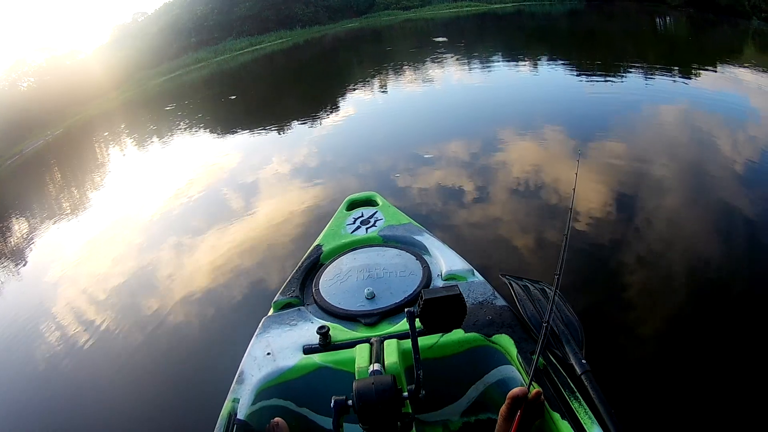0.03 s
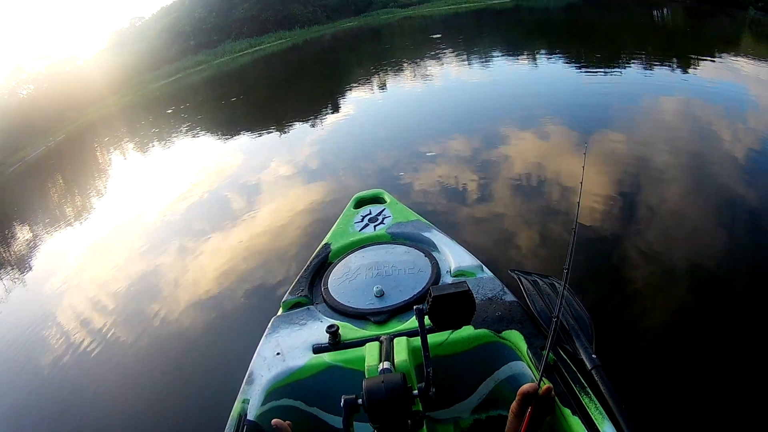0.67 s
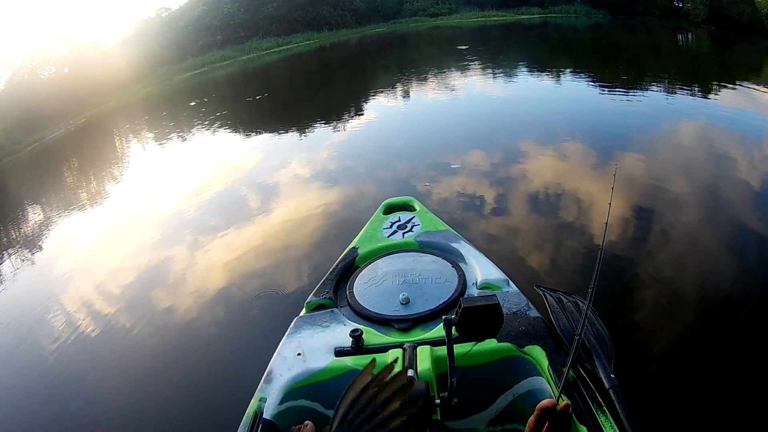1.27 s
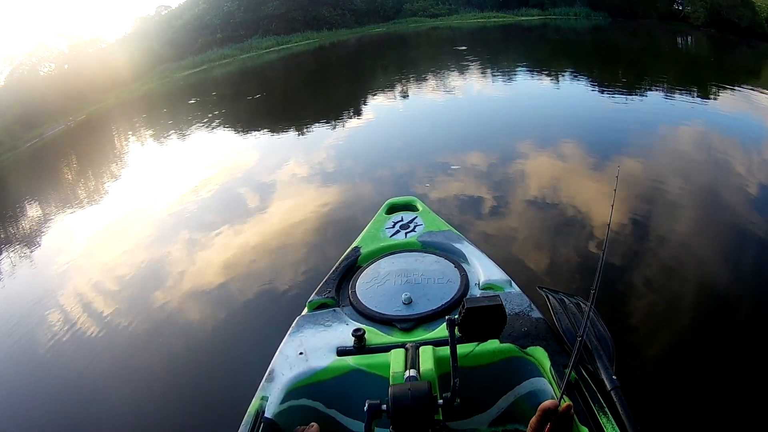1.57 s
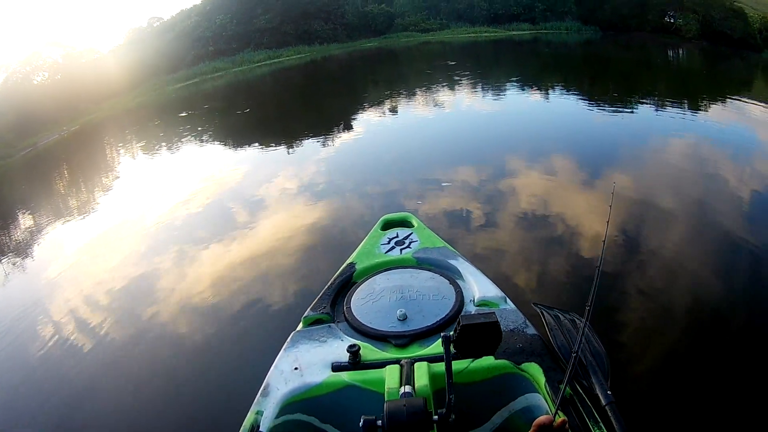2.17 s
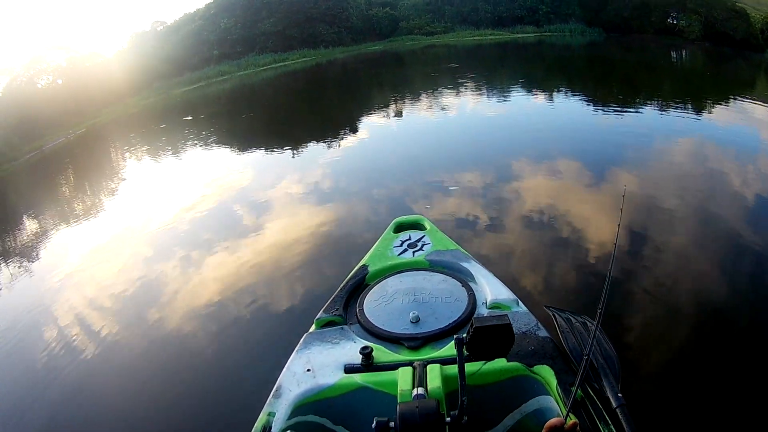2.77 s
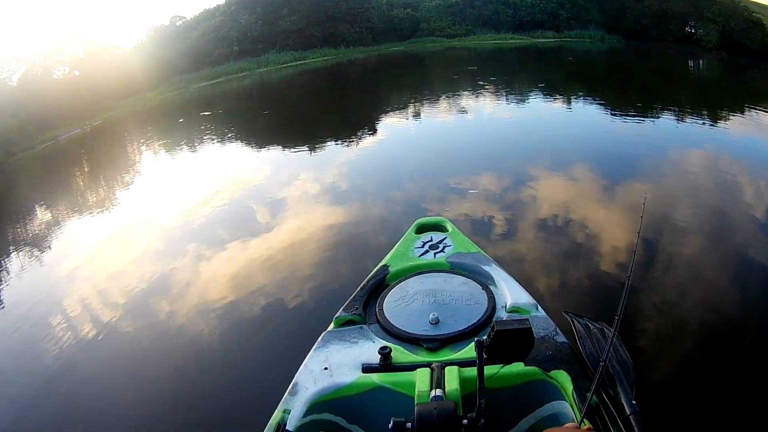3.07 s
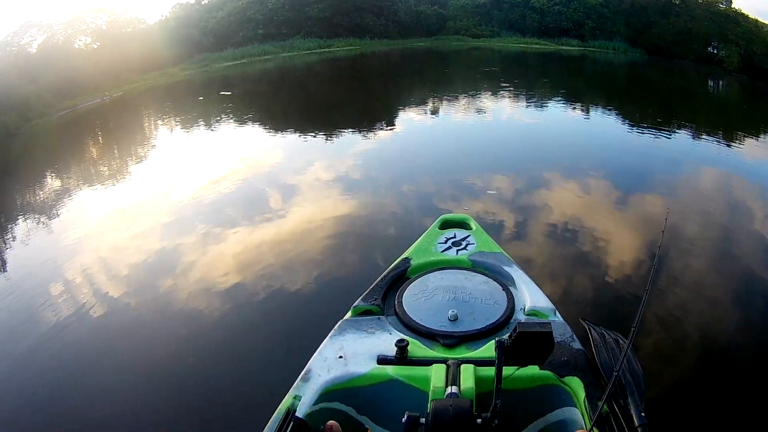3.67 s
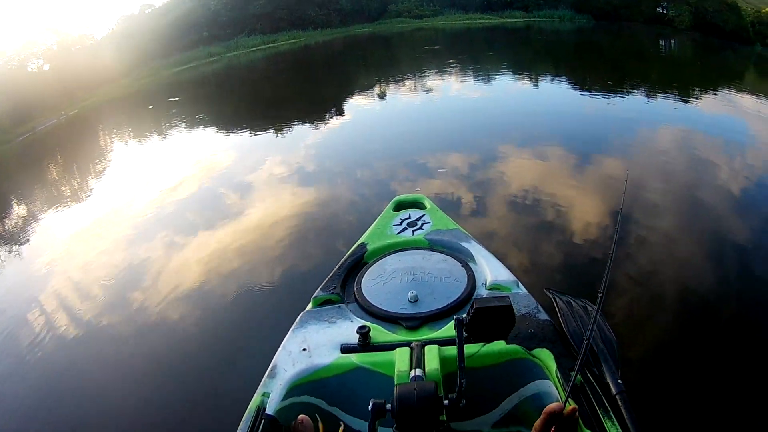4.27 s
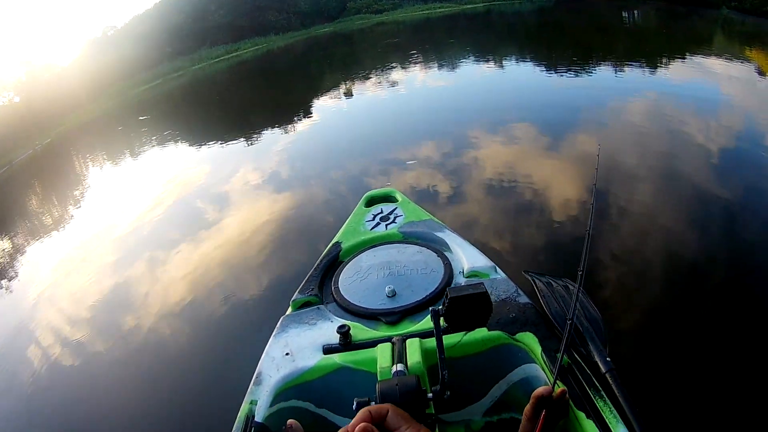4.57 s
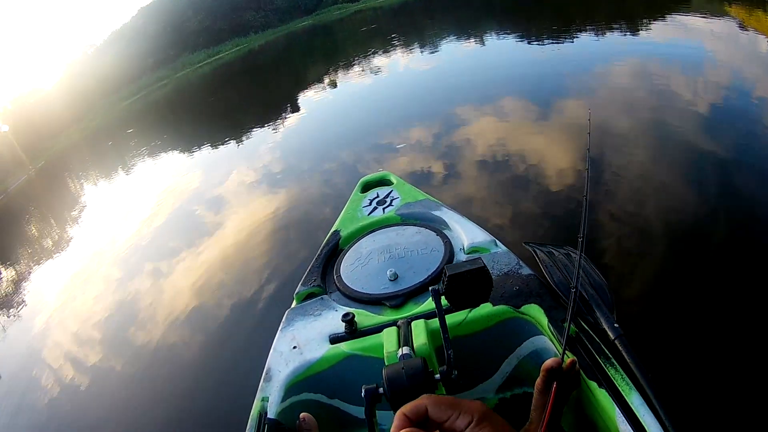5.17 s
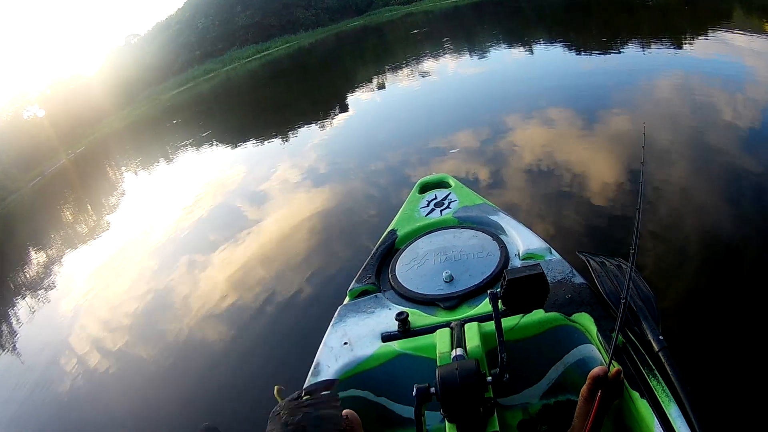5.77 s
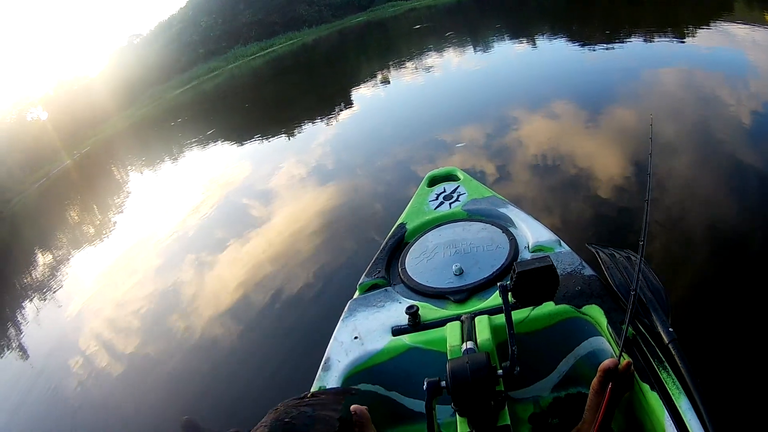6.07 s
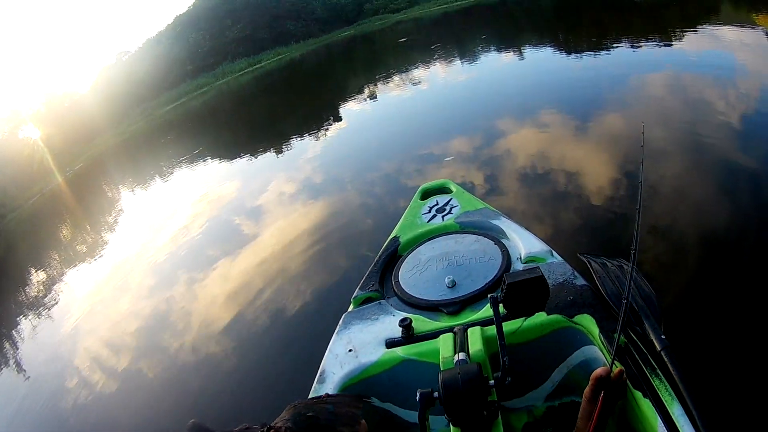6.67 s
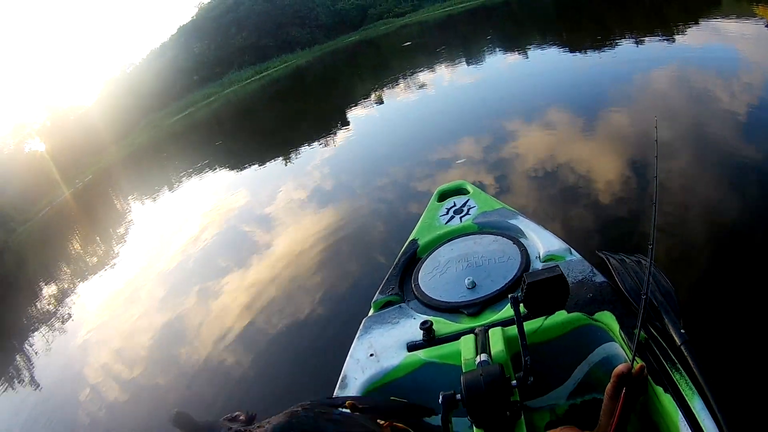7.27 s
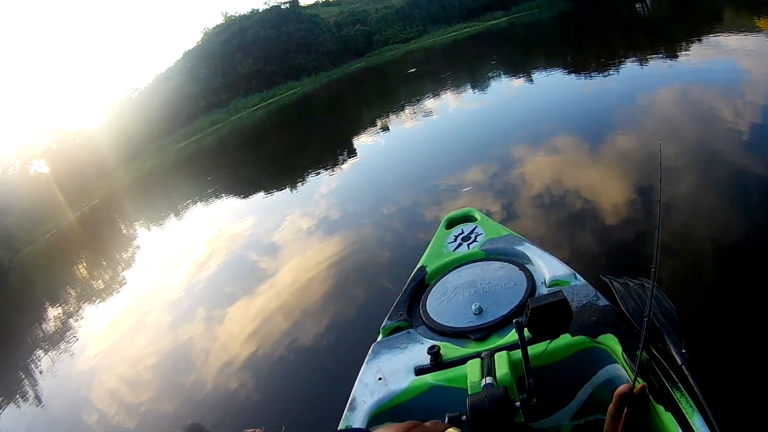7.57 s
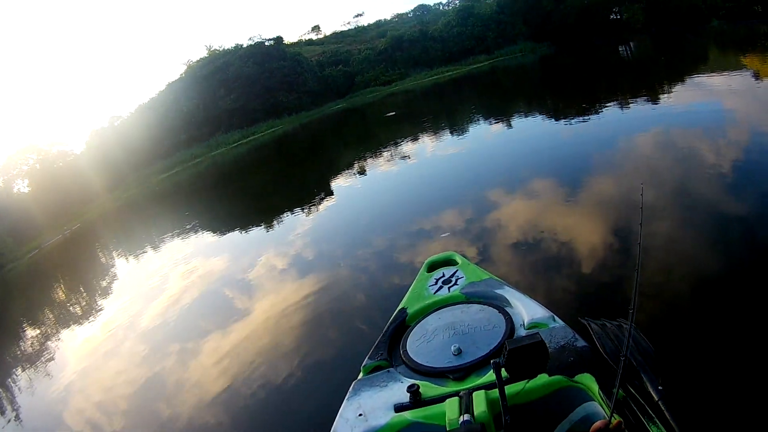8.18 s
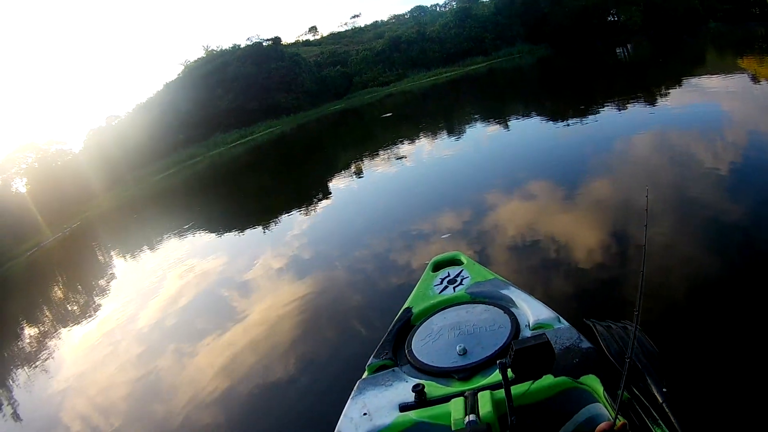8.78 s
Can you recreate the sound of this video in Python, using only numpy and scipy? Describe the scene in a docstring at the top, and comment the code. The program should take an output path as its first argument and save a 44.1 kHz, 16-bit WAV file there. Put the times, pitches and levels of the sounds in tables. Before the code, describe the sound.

On a calm lake, a distant engine hums faintly under soft air noise, tiny bird whistles and insect buzz. Up close, tackle is handled in a plastic kayak: first a run of hollow, rattly knocks and small clicks, then a brief rasping squeak. After a lull, the gear clatters and scrapes again, hits the hull with a single loud, distorting bang, and settles with some softer knocks.

```python
"""Fishing gear knocks, clicks and scrapes in a plastic kayak; one hard blow overloads the microphone.
Each knock rings the hull's modes and its hollow while the gear itself clacks; dragged gear
slips and squeaks. Behind it, on a still lake: open air, a far engine humming across the water,
one faint low tone, and birds whistling and insects buzzing on the bank."""
import sys
import numpy as np
from scipy import signal
from scipy.fft import rfft, irfft, next_fast_len
from scipy.io import wavfile

SR = 44100
rng = np.random.default_rng(int(sys.argv[2]) if len(sys.argv) > 2 else 0)


def to_wav(s):
    """Save 16-bit WAV."""
    ch = np.atleast_2d(s).T  # columns
    pcm = np.round(np.clip(ch, -1, 1) * 32767)  # PCM
    wavfile.write(sys.argv[1], SR, pcm.astype(np.int16))


N = 393813
T = np.arange(N) / SR


def undb(db):
    """Decibels to gain."""
    return 10 ** (np.asarray(db) / 20)


def unit_rms(x):
    """Scale to rms 1."""
    return x / np.sqrt(np.mean(x ** 2))


def unit_energy(x):
    """Scale to energy 1."""
    return x / np.sqrt(np.sum(x ** 2))


def add(out, start_s, x):
    """Mix x into out at start_s."""
    i = int(start_s * SR)
    out[i:i + len(x)] += x[:max(N - i, 0)]


def colour(x, points):
    """Minimum-phase filter through (freq_hz, gain_db) points."""
    hz, db = np.transpose(points)
    n = next_fast_len(len(x), True)
    bins_hz = np.maximum(np.fft.rfftfreq(n, 1 / SR), 1)
    gain = undb(np.interp(np.log(bins_hz), np.log(hz), db))
    cepstrum = irfft(np.log(gain), n)
    cepstrum[1:n // 2] *= 2
    cepstrum[n // 2 + 1:] = 0
    return irfft(rfft(x, n) * np.exp(rfft(cepstrum)), n)[:len(x)]


def cut(x, hz, kind, order=2):
    """Butterworth low-pass or high-pass."""
    return signal.sosfilt(signal.butter(order, min(hz, SR / 2 - 1), kind, fs=SR, output="sos"), x)


def resonate(x, hz, width_hz):
    """Band-pass resonance, applied twice for steep skirts."""
    b, a = signal.iirpeak(hz, hz / width_hz, fs=SR)
    return signal.lfilter(b, a, signal.lfilter(b, a, x))


def spring(x, hz, q):
    """Mass on a spring: a low-pass that rings at hz."""
    w = 2 * np.tan(np.pi * hz / SR)
    return signal.lfilter(*signal.bilinear([w * w], [1, w / q, w * w]), x)


def walk(rate_hz):
    """Random curve, spread near 1; holds after 512 knots."""
    knots = rng.standard_normal(512)
    return np.interp(T * rate_hz, np.arange(len(knots)), knots)


def fade(t, t60_s):
    """Exponential decay, 60 dB down at t60_s."""
    return np.exp(-np.log(1000) * t / t60_s)


def tone(hz):
    """Sine following a pitch curve."""
    return np.sin(2 * np.pi * np.cumsum(hz) / SR)


def swell(x):
    """Fade in and out under a rounded arch; rms 1."""
    u = np.linspace(0, 1, len(x))
    return unit_rms(x * (u * (1 - u)) ** (3 / 4))


def lake_air(level_db=-43.5, swell_db=0.5, swell_below_hz=1500):
    """Open air: the low part swells under an even hiss."""
    # air noise spectrum: freq_hz, gain_db
    spectrum = [(20, -7), (32, 6.5), (41, -7.5), (55, -3.5), (100, -5.5), (250, -7), (400, -10), (580, -8),
                (1100, -14), (1600, -22), (2400, -32), (4000, -38.5), (8000, -45), (15500, -47.5)]
    air = undb(level_db) * unit_rms(colour(rng.standard_normal(N), spectrum))
    return air + (undb(swell_db * walk(2.88)) - 1) * cut(air, swell_below_hz, "low", order=1)


def insects(flicker_db=2.4, pulse_db=0.7):
    """Insect choruses: narrow, flickering noise bands."""
    # centre_hz, width_hz, level_db
    choruses = [(4840, 240, -80.5), (5804, 509.7, -72.5)]
    out = np.zeros(N)
    for hz, width_hz, db in choruses:
        band = unit_rms(resonate(rng.standard_normal(N), hz, width_hz))
        out += band * undb(db + flicker_db * walk(30) + pulse_db * walk(12))
    return out


def engine(firing_hz=29.58, gain_db=-1.07, drift=0.0009, fading_db=1.5):
    """Firing harmonics and whines share one drifting speed and fade separately over the water."""
    # firing harmonics, fundamental first: level_db
    harmonics_db = [-54.5, -57, -53.5, -58.5, -51]
    # whines with sidebands a firing rate apart: pitch_hz, level_db, fall_per_sideband_db, odd_sideband_db
    whines = [(551.7, -52.5, 3, 0), (801.25, -60, 3, 1), (1066, -56.5, 1, -6)]
    clock_s = np.cumsum(1 + drift * walk(1.994)) / SR
    lines = [((k + 1) * firing_hz, db) for k, db in enumerate(harmonics_db)]
    lines += [(hz + k * firing_hz, db - fall_db * abs(k) + odd_db * (k % 2))
              for hz, db, fall_db, odd_db in whines for k in range(-3, 3)]
    hum = np.zeros(N)
    for k, (hz, db) in enumerate(lines):
        phase = np.pi * k ** 2 / np.sqrt(len(lines))  # distance smears the firings into an even hum
        hum += undb(db + fading_db * walk(3.047)) * np.sin(2 * np.pi * hz * clock_s + phase)
    return undb(gain_db) * np.sqrt(2) * hum


def far_tone(start_s=4.5, length_s=1.2, pitch_hz=455.5, level_db=-53.5, waver=0.0075):
    """One faint, nearly steady tone from far away."""
    out = np.zeros(N)
    curve_hz = pitch_hz * (1 + waver * walk(11.9))[:int(length_s * SR)]
    add(out, start_s, undb(level_db) * swell(tone(curve_hz)))
    return out


def far_song(start_s=2.25, end_s=5, gap_s=0.15, length_s=0.12, pitch_hz=2720, level_db=-76.5):
    """Faint scattered whistles, as rows of start_s, length_s, pitch_hz, level_db, slide."""
    return [(start_s + gap_s * (k + late / 2), length_s, pitch_hz * (1 + 0.05 * detune),
             level_db, 0.086 * lean)
            for k, (late, detune, lean) in enumerate(rng.standard_normal((20, 3)))
            if start_s + gap_s * k < end_s]


def birds(waver=0.0044, flutter_db=4.5, echo_db=-9, echo_t60_s=0.58):
    """Fluttering calls, whistles and chirps with a faint echo from the trees."""
    # two-note calls: start_s, pitch_hz, level_db
    calls = [(1.432, 3400, -63.5), (8.505, 3260, -60)]
    # short and long arch of a call: delay_s, length_s, pitch_ratio, gain_db, slide, droop
    call_notes = [(0, 0.081, 0.97, -1.5, -0.132, .22), (0.147, 0.328, 0.96, -4, .04, .21)]
    # near-level whistles: start_s, length_s, pitch_hz, level_db
    whistles = [(.174, 0.11, 2638, -65.5), (1.177, 0.086, 2935, -63), (2.954, .07, 3300, -71),
                (8.158, .17, 2517, -64.5), (8.76, 0.12, 2640, -65.5)]
    # scratchy falling chirps: start_s, mid_hz, level_db
    chirps = [(3.53, 3100, -65), (3.658, 2850, -67), (3.723, 3050, -68), (3.804, 3050, -66),
              (4.277, 3000, -67), (4.35, 2800, -70), (5.146, 5400, -67), (5.428, 5400, -66),
              (5.608, 4900, -72), (6.087, 5200, -64.5)]
    out = np.zeros(N)
    wobble, scratch = 1 + waver * walk(50.5), walk(700)

    def note(start_s, length_s, hz, db, slide, droop=0, rough=0):
        """Pitch slides, and droops at both ends, by fractions of hz."""
        n = int(length_s * SR)
        u = np.linspace(-1, 1, n)
        contour_hz = hz * (1 + slide * u / 2 - droop * u ** 2)
        add(out, start_s, undb(db) * swell(tone(contour_hz * (wobble[:n] + rough * scratch[:n]))))

    for start_s, hz, db in calls:
        for delay_s, length_s, ratio, gain_db, slide, droop in call_notes:
            note(start_s + delay_s, length_s, hz * ratio, db + gain_db, slide, droop)
    for row in whistles:
        note(*row, slide=0.022)
    for start_s, hz, db in chirps:
        note(start_s, length_s=0.036, hz=hz, db=db, slide=-0.305, rough=0.028)
    for row in far_song():
        note(*row)
    song = out * unit_rms(undb(flutter_db * walk(45)))
    trees = unit_energy(rng.standard_normal(SR) * fade(T[:SR], echo_t60_s))
    return song + undb(echo_db) * signal.fftconvolve(song, trees)[:N]


def scrapes(squeak_jitter=0.051, squeak_rough_db=4, rasp_top_hz=2700):
    """Dense uneven slips ring the dragged gear; where it sticks, it squeaks roughly."""
    # drags over the deck: start_s, length_s, level_db, squeak_from_hz, squeak_to_hz, squeak_db
    drags = [(2.804, .02, -45, 3400, 3700, -11), (2.813, 0.079, -41.5, 3250, 3110, -13.5),
             (2.868, 0.059, -52, 3280, 3220, -11), (5.729, 0.031, -42, 3473, 3400, -34),
             (5.846, 0.083, -43.5, 2940, 2800, -19)]
    # drag resonances: centre_hz, width_hz, gain_db
    resonances = [(1270, 740, 4), (1730, 260, -11), (3122, 1200, -13)]
    out = np.zeros(N)
    jitter = 1 + squeak_jitter * walk(690)
    grip = undb(squeak_rough_db * walk(310))
    for start_s, length_s, db, from_hz, to_hz, squeak_db in drags:
        n = int(length_s * SR)
        slips = rng.standard_normal(SR // 4)[:n] ** 3
        rasp = sum(undb(gain_db) * resonate(slips, hz, width_hz) for hz, width_hz, gain_db in resonances)
        rasp = cut(unit_rms(rasp), rasp_top_hz, "low", order=4)
        squeak = unit_rms(tone(np.linspace(from_hz, to_hz, n) * jitter[:n]) * grip[:n])
        add(out, start_s, undb(db) * swell(rasp + undb(squeak_db) * squeak))
    return out


def gear_clack(t, t60_s):
    """Hard gear struck: a bright noise burst."""
    # clack spectrum: freq_hz, gain_db
    spectrum = [(700, -33), (1800, 10.5), (2500, -9), (3200, -1.5), (3700, 1), (4300, -2.5), (4700, -18),
                (6000, -18.5), (8000, -38), (15000, -46)]
    return colour(rng.standard_normal(len(t)) * fade(t, t60_s), spectrum)


def ticks(t60_s=0.032, lowest_hz=2100):
    """Light tackle clicks in the hand, clear of the hull."""
    # start_s, level_db
    clicks = [(.032, -28.5), (.393, -29), (0.522, -27.5), (0.8735, -23.5), (3.98, -25), (4.894, -33)]
    out = np.zeros(N)
    for start_s, db in clicks:
        click = cut(gear_clack(T[:SR // 4], t60_s), lowest_hz, "high")
        add(out, start_s, undb(db) * unit_energy(click))
    return out


def hull_ring(t, tuning, damping, hollow_db=-14, hollow_t60_s=0.25):
    """Impulse response of one spot plus the hollow; adjacent modes oppose, so the ring builds briefly."""
    # hull modes before tuning and damping: freq_hz, level_db, t60_s
    modes = [(190.7, -32.5, 0.44), (236, -12.5, 0.12), (271, -17, 0.15), (372, -10.5, 0.047),
             (497, -10.5, 0.12), (601, 3, 0.036), (714, -1.5, 0.032), (809, -3, 0.032),
             (1022, -10.5, 0.034), (1216, -5.5, 0.054), (1448, -11.5, 0.047), (1648, -6.5, 0.017),
             (2006, -16.5, 0.073), (2176, -9.5, 0.073), (2346, -2.5, 0.011)]
    # diffuse ring inside the hull: freq_hz, gain_db
    hollow_spectrum = [(80, -15), (200, -1), (400, -2), (600, 1.5), (1200, -5.5), (1800, -5.5), (2400, -8),
                       (3000, -28), (6000, -26)]
    shell = sum((-1) ** k * undb(db) * np.sin(2 * np.pi * hz * tuning * t) * fade(t * damping, t60_s)
                for k, (hz, db, t60_s) in enumerate(modes))
    hollow = colour(rng.standard_normal(len(t)) * fade(t, hollow_t60_s), hollow_spectrum)
    return unit_energy(shell) + undb(hollow_db) * unit_energy(hollow)


def contact_force(t, chatter_s, looseness, above_firm_db, chatter_db=-4, firm_hz=4800, octave_db=5.8):
    """One impact, then small re-contacts; a lighter touch is a longer, softer push."""
    recontacts = unit_energy(rng.standard_normal(len(t)) ** 3 * np.exp(-t / chatter_s))
    force = undb(chatter_db) * looseness * recontacts
    force[0] += 1
    return cut(force, firm_hz * 2 ** (above_firm_db / octave_db), "low")


def knocks(gain_db=22, firm_db=-20, rim_below_db=-6, loose_chatter_s=0.0052, clack_t60_s=0.038,
           tip_delay_s=0.006, tip_db=-1.3, tip_pitch_ratio=1.25, tip_tuning=0.81, lowest_hz=150):
    """Gear chatters on the hull, rings it and clacks; a firm blow tips it onto its other end too."""
    # gear striking the hull: start_s, level_db, pitch_hz, boom_db, clack_db, chatter_s
    blows = [ (0.093, -17, 930, 8, -16.5, 0.0078), (0.1767, -25.5, 1170, 6, -19.5, 0.0077),
             (0.4428, -26.5, 1020, 10, -21, 0.0044), (0.9388, -15, 1200, 7.5, -11.5, 0.0085),
             (0.969, -24.5, 1000, 2, -13, .0009), (1.362, -32, 1020, 7, -25, 0.015),
             (1.470, -29.5, 840, 9, -22, 0.0018), (1.5276, -25.5, 1650, -3, -29, 0.0056),
             (1.5536, -26, 855, 14, -24, 0.0014), (1.9685, -37, 790, -4, -34, .0013),
             (4.469, -34, 220, -5, -30, 0.0051), (5.563, -30, 226, -2, -27.5, 0.0069),
             (5.7288, -34.5, 1600, -5, -8, .021), (5.854, -29.5, 1100, -12, -27, 0.0071),
             (5.8701, -17.5, 1050, -7, -34, .0025), (5.900, -25.5, 1230, -4, -36, .0008),
             (5.916, -30, 1260, -6, -30, 0.007), (5.964, -31, 935, -3, -25, 0.0018),
             (6.0676, -31.5, 900, -2, -38, .001), (6.546, -20.5, 749.7, -5, -15.5, 0.000955),
             (6.5622, -0.46, 1180, 0.5, -29, 0.0002), (6.612, -16, 1240, 0, -28, .0022),
             (6.954, -34.5, 1280, -8.5, -20, .003), (7.004, -25, 980, -11, -32.5, .005),
             (7.0424, -34.5, 870, -4, -19, .001)]
    t, out = T[:SR // 4], np.zeros(N)
    for start_s, db, pitch_hz, boom_db, clack_db, chatter_s in blows:
        looseness = chatter_s / loose_chatter_s
        rim_db = max(rim_below_db - boom_db, 0)  # little boom: the stiff rim
        gear_q = 2.24 + 0.8 * rim_db  # gear rings longer on the rim
        damping = 1.5 - 0.014 * db  # after a light touch the gear stays on the hull and damps it
        # the magnitude sets the pitch: the lightest touches go far negative and ring high
        tuning = 1.02 - 0.36 * max(firm_db - db, 0) + 0.27 * rim_db
        landings = [(start_s, 1, pitch_hz, tuning, boom_db)]
        if db > firm_db:
            tip_gain = undb(tip_db) * min(looseness, 1)
            tip_hz = pitch_hz * tip_pitch_ratio
            landings.append((start_s + tip_delay_s, tip_gain, tip_hz, tip_tuning, min(boom_db, 0)))
        for land_s, gain, gear_hz, spot_tuning, panel_db in landings:
            force = contact_force(t, chatter_s, looseness, db - firm_db)
            body = signal.fftconvolve(force, hull_ring(t, spot_tuning, damping))[:len(t)]
            body = cut(spring(body, gear_hz, gear_q), lowest_hz, "high")  # the gear lends its own pitch
            body += (undb(panel_db) - 1) * resonate(body, hz=250, width_hz=190)  # mid-panel booms more
            clack = undb(clack_db) * unit_energy(gear_clack(t, clack_t60_s + 2 * chatter_s))
            add(out, land_s, gain * undb(db + gain_db) * (unit_energy(body) + clack))
    return out


def scene():
    """Near handling sounds over the far background; mono."""
    handling = knocks() + ticks() + scrapes()
    background = birds() + far_tone() + engine() + lake_air() + insects()
    return (handling + background)[None]


def record(dry):
    """Clip at full scale, then cut the top."""
    top_hz = 15850
    return signal.sosfilt(signal.ellip(10, 0.1, 80, top_hz, fs=SR, output="sos"), np.clip(dry, -1, 1))


dry = scene()
out = record(dry)
to_wav(out)
```